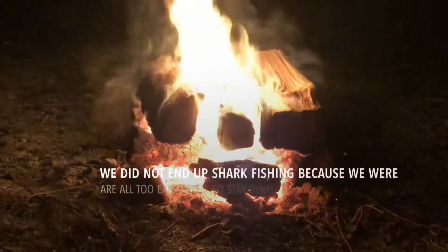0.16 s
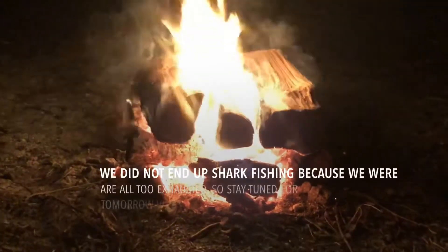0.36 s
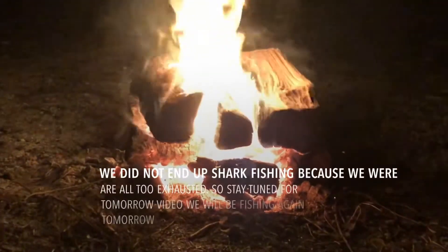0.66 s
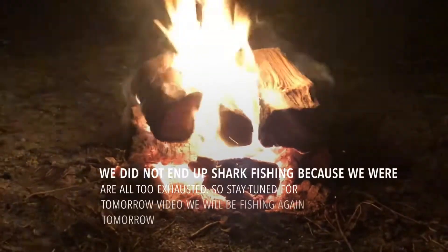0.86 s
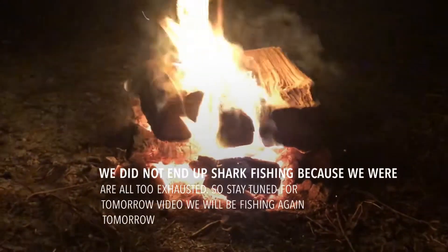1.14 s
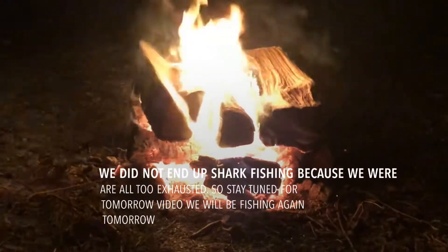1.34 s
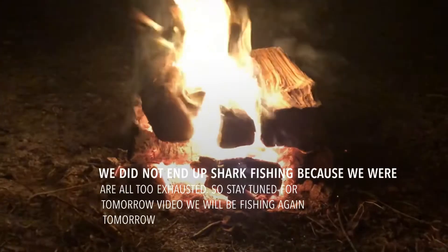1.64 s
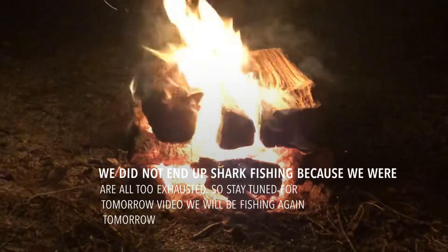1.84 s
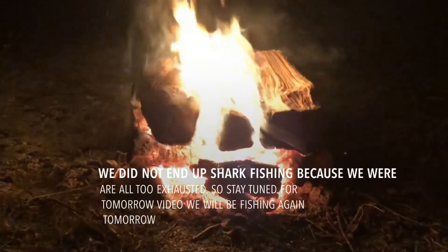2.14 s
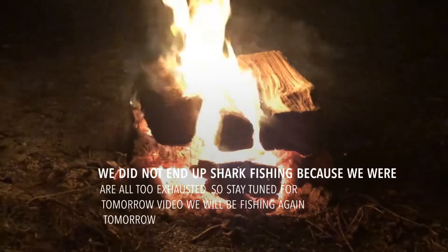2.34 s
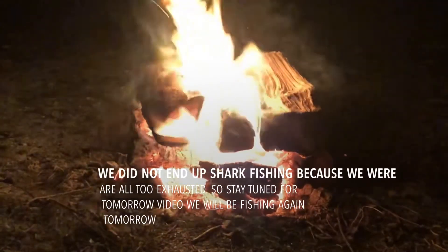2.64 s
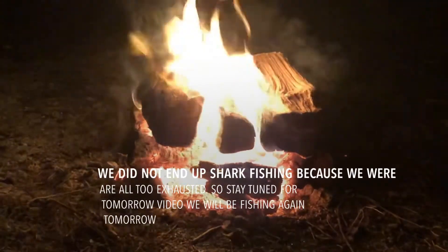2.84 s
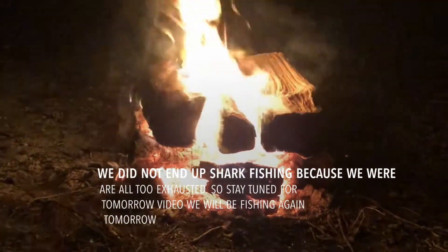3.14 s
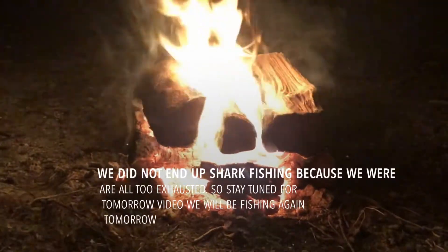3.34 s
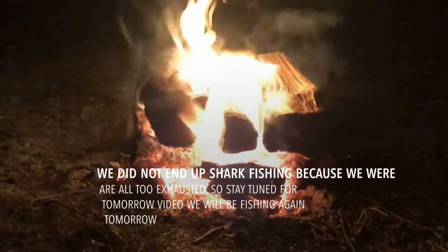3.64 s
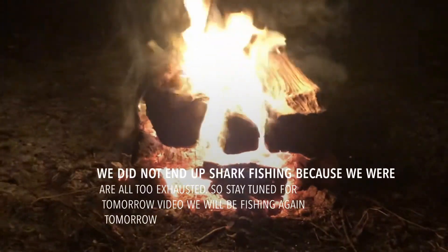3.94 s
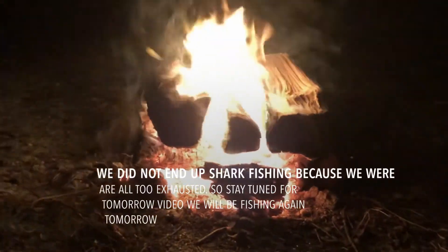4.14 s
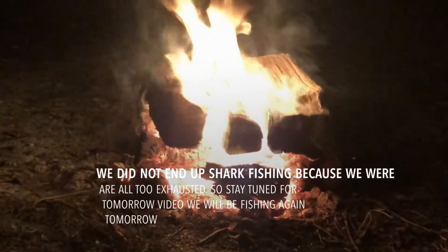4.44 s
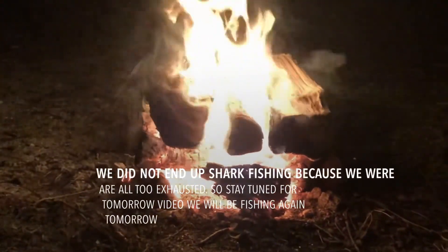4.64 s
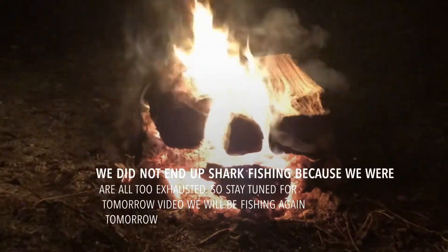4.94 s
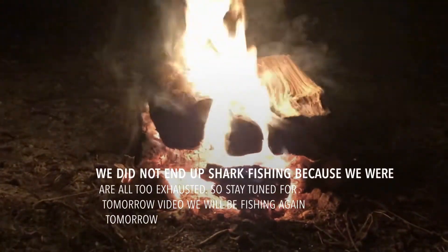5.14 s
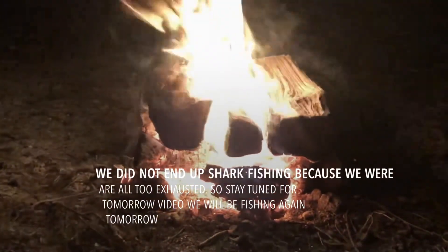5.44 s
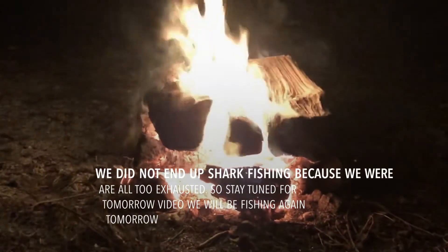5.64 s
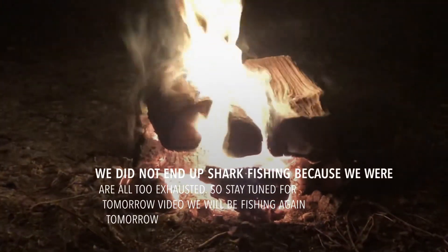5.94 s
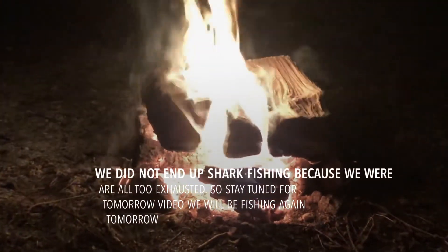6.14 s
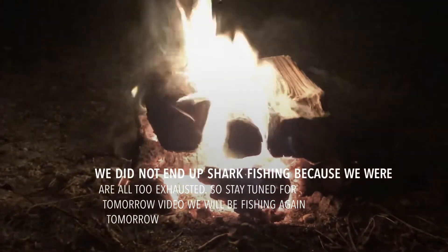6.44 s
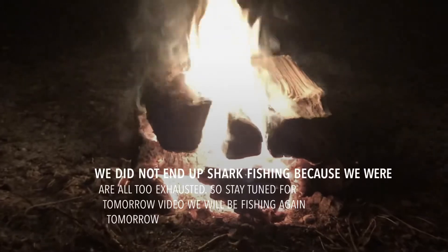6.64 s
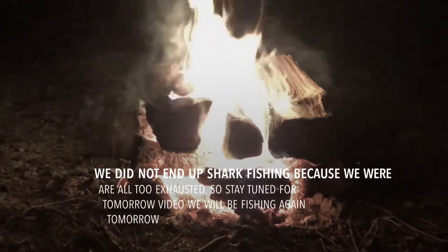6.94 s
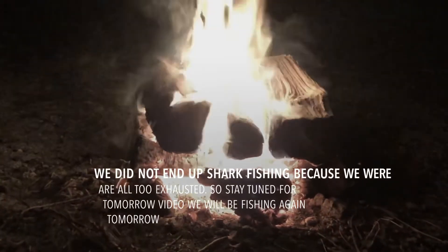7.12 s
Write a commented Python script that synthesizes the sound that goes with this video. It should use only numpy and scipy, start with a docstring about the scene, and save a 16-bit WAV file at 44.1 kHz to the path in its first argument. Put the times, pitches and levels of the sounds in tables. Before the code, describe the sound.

Crickets trill on and off outdoors as burning wood ticks and snaps, with a low flutter of flames and two soft scuffs late on.

```python
"""A campfire at night. From the start, turbulent flames rumble and hiss, the wood ticks, knocks and
pops as its cell walls burst, and a near cricket scrapes its wings in bouts of double pulses over a far
chorus. A lower insect soon joins faintly, and two fainter crickets call between 1.2 and 2.2 s.
At 5.8 s sap sizzles briefly. From 6.3 s something close by scuffs twice by friction, with a soft
swish in between, and the loudest pop comes just before the end."""
import sys
import numpy as np
from scipy import signal
from scipy.fft import rfft, irfft
from scipy.io import wavfile

SR = 44100
rng = np.random.default_rng(int(sys.argv[2]) if len(sys.argv) > 2 else 0)


def wav_out(sig):
    """Save sig, one row per channel (or a flat mono array), as 16-bit PCM at SR to the path in sys.argv[1]."""
    wavfile.write(sys.argv[1], SR, np.round(np.clip(np.atleast_2d(sig).T, -1, 1) * 32767).astype(np.int16))


N = 321043
TIME = np.arange(N) / SR


def pop(ring_hz, ring_db, body_hz, body_db, decay_ms, ring_width_hz=1100, body_width_hz=500):
    """Impulse response: a cell wall bursts and splinters, with a treble ring and a body; unit energy."""
    # spectra of the treble snap and of the woody body: f/Hz, level/dB
    snap_spectrum = [(500, -55), (2800, -25), (4800, -6.5), (8000, -3), (12000, -3), (16000, -5)]
    body_spectrum = [(200, -21), (900, -8), (2500, 8), (5000, 6), (8000, -6), (16000, -35)]
    size = 1024
    hz = abs(np.fft.fftfreq(size, 1 / SR))
    ms = np.arange(size) / SR * 1000
    crack = read(snap_spectrum, hz) * (1 + gain_of(ring_db) / (1 + ((hz - ring_hz) / ring_width_hz) ** 2))
    body = read(body_spectrum, hz) * (1 + gain_of(2) / (1 + ((hz - body_hz) / body_width_hz) ** 2))
    colour = np.hypot(evened(crack), gain_of(body_db + 3) * evened(body))
    ring_down = np.fft.ifft(np.exp(np.conj(signal.hilbert(np.log(colour))))).real  # minimum phase
    splinters = .42 * rng.standard_normal(size) * np.exp(-ms / decay_ms)
    splinters[8] = 1  # the main snap follows the first splinters
    sound = signal.fftconvolve(splinters, ring_down)
    return sound / np.linalg.norm(sound)


def crackle(boost_db=7):
    """Shot noise: many small bursts fall at random among the loud pops, some woody and some thin."""
    # t/s, level before boost/dB, ring f/Hz, ring level/dB, relative body level/dB
    loud_pops = [(.2753, -35, 11900, 10, -25), (.403, -26, 9400, -5, -3), (.446, -24, 9150, 6, -15.5),
                 (.7615, -21.5, 12500, -13, -30), (.8215, -30, 12500, 5, -1),
                 (1.1934, -30.5, 7350, -4, -11), (1.2715, -25, 12400, 18, -16),
                 (1.5344, -33, 11400, 8, -14), (1.5857, -25.5, 10100, 4, -19), (1.6458, -33, 7290, 3, -10),
                 (1.6873, -24, 14800, -6, -32), (1.9693, -35.5, 11500, 0, -8), (2.0268, -32, 14100, 1, -26),
                 (2.0773, -25, 12200, 7, -16), (2.1141, -32.5, 9020, 3, -14),
                 (2.1639, -23.5, 10200, 1, -39), (2.6922, -22, 11900, 4, -22),
                 (3.0734, -34, 13600, -1, -12), (3.4511, -31.5, 12500, -2, -15),
                 (3.7257, -18, 11600, -5, -20), (3.8821, -31.5, 11800, -2, -19), (4.3092, -31, 7320, 3, -6),
                 (4.729, -18.5, 10300, 6, -16), (5.0926, -26.5, 13800, 10, -16),
                 (5.8262, -31, 13400, -4, -13), (6.2261, -20.5, 11350, 27, -25.5),
                 (6.4981, -30.5, 12000, 20, -24), (6.6376, -27, 10700, 3, -25),
                 (7.0104, -27, 13700, 8, -13), (7.018, -27, 9000, -5, -26), (7.177, -24.5, 10500, 3, -18),
                 (7.22, -11, 11500, 10, -17)]
    # small pops and tiny ticks: rate/(1/s), least level before boost/dB, spread/dB, decay t/ms
    small_pops = [(3, -41, 1, 0.54), (80, -55.5, 3, .8)]
    pop_body_hz = 5200  # the mid-treble peak colouring the loud pops
    out = np.zeros(N)
    for start, db, ring_hz, ring_db, body_db in loud_pops:
        sound = pop(ring_hz, ring_db, pop_body_hz, body_db, decay_ms=.54)
        add(out, start + .001, gain_of(db + boost_db) * sound)
    for rate, least_db, spread_db, decay_ms in small_pops:
        draws = rng.random((2048, 5))[:round(rate * N / SR)]
        for when, size, ring_pitch, body_pitch, thinness in draws:
            db = least_db + spread_db * min(-np.log(size), 3.5)
            sound = pop(ring_hz=np.interp(ring_pitch, (0, 1), (8400, 14900)), ring_db=10,
                        body_hz=np.interp(body_pitch, (0, 1), (1500, 5640)), body_db=-1 - 20 * thinness,
                        decay_ms=decay_ms)
            add(out, when * N / SR, gain_of(db + boost_db) * sound)
    return outdoors(out, wet_db=-11, t60=.04)


def flames():
    """Turbulent combustion: burning gas flutters low and flaps in short puffs, under an even hiss."""
    # rumble, hiss of flames and night air, and puffs: f/Hz, relative spectral level/dB
    rumble_spectrum = [(20, -45), (30, -33), (42, -11), (60, 1), (85, -0.5), (140, -2), (200, -7.5),
                       (340, -13), (500, -19.5), (800, -28), (1300, -48), (2200, -80)]
    hiss_spectrum = [(300, 0.5), (700, -1), (1000, 2.5), (1600, -1.5), (2200, -4), (4000, -6), (5500, -6),
                     (7200, -9), (9500, -11.5), (11000, -11), (13500, -7.5), (15800, -14.5)]
    puff_spectrum = [(70, -25), (160, 0), (330, -2), (500, -12), (900, -31), (2000, -70)]
    rumble = fluttering_noise(rumble_spectrum, depth_db=1, rate_hz=9)
    hiss = fluttering_noise(hiss_spectrum, depth_db=1.22, rate_hz=25)
    puffs = fluttering_noise(puff_spectrum, depth_db=4.5, rate_hz=12)
    return gain_of(-50) * evened(rumble) + gain_of(-60) * evened(puffs) + gain_of(-62) * hiss


def knocks():
    """Damped oscillation: each knock rings one or two short tones."""
    # t/s, level/dB, f/Hz, 60 dB decay t/s
    modes = [(.4042, -44.5, 1110, 0.0093), (0.7632, -37.5, 4770, 0.008), (4.251, -45, 3500, .013),
             (4.655, -45.5, 1700, .02), (4.656, -47.5, 2940, .01), (4.7303, -39, 5400, 0.014),
             (7.012, -40.5, 4300, .008), (7.133, -25.5, 1380, 0.0068), (7.133, -40, 950, .012)]
    out, t = np.zeros(N), np.arange(SR // 20) / SR
    for start, db, hz, t60 in modes:
        add(out, start, gain_of(db - 60 * t / t60) * np.sin(2 * np.pi * hz * t))
    return outdoors(out, wet_db=-8, t60=.04)


def sap_sizzle():
    """Modulated noise: sap sizzles in one short, grainy burst of treble."""
    # start t/s, attack t/s, hold t/s, release t/s, level/dB
    burst = (5.843, .01, .075, .07, -61.5)
    # f/Hz, relative spectral level/dB
    spectrum = [(6000, -25), (9000, -2), (10500, 2), (13500, -1), (16000, -10)]
    return grainy_noise(burst, spectrum, grain_db=6)


def cricket(bouts, hz, db, wet_db, waver_hz, roughness):
    """Stridulation: two wing strokes make a chirp; the note sags as the scraper slows to end each."""
    attack, hold, release = .004, .0072, .011  # of one stroke, t/s
    chirp_period_s, stroke_spacing_s, sag_hz_per_s = .063, .0217, 25000
    t = np.arange(0, attack + hold + release, 1 / SR)
    shape = envelope(t, attack, hold, release)
    pitch = hz - sag_hz_per_s * np.maximum(t - attack - hold, 0)
    out = np.zeros(N)
    for first, last in bouts:
        for chirp in paced(first, last, chirp_period_s):
            for middle in (chirp, chirp + stroke_spacing_s):
                detune, size = rng.standard_normal(2)
                stroke = shape * np.sin(phase_of(pitch + 6 * detune))
                if middle > 0:
                    add(out, middle - attack - hold / 2, gain_of(db + .5 * size) * stroke)
    # uneven teeth on the file shake pitch and level
    shake = np.exp(1j * phase_of(waver_hz * drift(250))) * (1 + roughness * drift(300))
    return outdoors((signal.hilbert(out) * shake).real, wet_db, t60=.055)


def crickets():
    """Superposition: one near cricket and two fainter ones call, each at its own pitch."""
    # f/Hz, level/dB, relative echo level/dB, waver f/Hz, roughness (0-1)
    voices = [(6005, -42.3, -16, 14, .13), (5740, -56, -3, 40, .25), (5570, -61, -4, 25, .15)]
    # index of the cricket, first chirp t/s, last chirp t/s
    bouts = [(0, -.024, .164), (0, .477, .477), (0, .867, 1.179), (2, 1.265, 1.33), (1, 1.39, 2.17),
             (0, 1.481, 2.048), (0, 2.435, 3.129), (0, 3.611, 3.987), (0, 4.928, 5.684), (0, 6.125, 6.754),
             (0, 7.078, 7.267)]
    out = np.zeros(N)
    for index, voice in enumerate(voices):
        own_bouts = [(first, last) for caller, first, last in bouts if caller == index]
        out += cricket(own_bouts, *voice)
    return out


def scuffs_and_swish():
    """Friction: streams of tiny, uneven slips make two gritty scuffs and a smoother swish."""
    # start t/s, attack t/s, hold t/s, release t/s, level/dB
    scuff_strokes = [(6.304, .011, .056, .035, -46.2), (7.033, .06, .095, .3, -46.6)]
    swish_stroke = (6.425, .225, .135, .14, -51)
    # one spectrum for each stroke: f/Hz, relative spectral level/dB
    scuff_spectra = [
        [(250, -12), (470, 3.5), (680, -10), (920, -3), (1100, -12), (1290, -6), (1500, -13), (1800, -7),
         (2300, -16), (4400, -14.5), (8000, -19.5), (16000, -26)],
        [(300, -2), (580, -7), (850, 0), (1100, -5.5), (1400, -2.5), (1850, -4), (2300, -9), (4000, -12),
         (7000, -17), (11000, -26), (16000, -30)],
    ]
    swish_spectrum = [(500, 3.5), (2500, -7), (4500, 1), (7000, 3), (9000, -3), (11000, 0.5), (14000, -3),
                      (16000, -15)]
    scuffs = sum(grainy_noise(stroke, spectrum, grain_db=2)
                 for stroke, spectrum in zip(scuff_strokes, scuff_spectra))
    return scuffs + grainy_noise(swish_stroke, swish_spectrum, grain_db=1)


def far_chorus(blur_hz=42, stroke_hz=46):
    """Scattering smears the strokes of far crickets, each chirping at its own rate, into a shimmer."""
    # f/Hz, level/dB, chirp rate f/Hz, bout rate f/Hz
    voices = [(5790, -69.5, 15.4, 0.777), (5990, -64.5, 21, 1.1), (6140, -66.5, 14, 0.68),
              (6160, -63.5, 14, 1.19), (6240, -65.5, 17.3, 0.866), (6420, -71.5, 17, 1.6)]
    out = np.zeros(N)
    for hz, db, chirp_hz, bout_hz in voices:
        strokes = np.maximum(np.sin(phase_of(stroke_hz * (1 + .2 * drift(10)))) + .6, 0)
        chirps = 1 + .5 * np.sin(phase_of(chirp_hz * (1 + .1 * drift(4))))
        bouts = 1 + .5 * np.tanh(2 * drift(bout_hz * 2))
        note = np.sin(phase_of(hz + blur_hz * drift(130)))
        out += gain_of(db) * evened(outdoors(strokes * chirps * bouts * note, wet_db=4, t60=.09))
    return out


def low_insect(hz=4080, db=-72, chirp_s=.275, period_s=.42, stroke_hz=42, pulse_hz=15):
    """Amplitude modulation shapes a faint note, blurred by distance, into chirps of a few pulses."""
    # first chirp t/s, last chirp t/s, relative level/dB
    runs = [(.39, 2.06, -1), (2.47, 3.28, 1.5), (3.72, 4.2, -1.5), (4.92, 5.77, 0)]
    t = np.arange(0, chirp_s, 1 / SR)
    pulses = 1 + .32 * np.cos(2 * np.pi * pulse_hz * (t - chirp_s / 2))
    chirp = signal.windows.tukey(len(t), .5) * pulses
    level = np.zeros(N)
    for first, last, run_db in runs:
        for middle in paced(first, last, period_s):
            add(level, middle - chirp_s / 2, gain_of(run_db) * chirp)
    note = np.sin(phase_of(hz + 50 * drift(150)))
    strokes = 1 + np.sin(phase_of(stroke_hz * (1 + .25 * drift(15))))
    return gain_of(db + drift(5)) * level * evened(outdoors(note * strokes, wet_db=0, t60=.08))


def outdoors(x, wet_db, t60):
    """Scattering from ground and plants adds a thin, short tail."""
    t = np.arange(SR // 3) / SR
    tail = rng.standard_normal(len(t)) * gain_of(-60 * t / t60) * (t > .001)
    return x + gain_of(wet_db) * signal.fftconvolve(x, tail / np.linalg.norm(tail))[:N]


def fluttering_noise(spectrum, depth_db, rate_hz):
    """Slow random modulation makes the level of coloured noise flutter."""
    return coloured(rng.standard_normal(N), spectrum) * gain_of(depth_db * drift(rate_hz))


def grainy_noise(stroke, spectrum, grain_db):
    """Fast random modulation breaks noise into grains, filtered and set under one envelope."""
    start, attack, hold, release, db = stroke
    grains = rng.standard_normal(N) * gain_of(grain_db * drift(400))
    return gain_of(db) * envelope(TIME - start, attack, hold, release) * coloured(grains, spectrum)


def coloured(x, spectrum):
    """Filtering: multiplies the spectrum of x by the given one; rms 1."""
    hz = np.fft.rfftfreq(len(x), 1 / SR)
    return evened(irfft(rfft(x) * read(spectrum, hz), len(x)))


def read(spectrum, hz):
    """Interpolation on a log-frequency axis gives a spectrum's gain at hz."""
    f, db = np.transpose(spectrum)
    return gain_of(np.interp(np.log(hz + 1), np.log(f + 1), db))


def drift(hz):
    """Random fluctuation of rms 1, mostly below the given rate."""
    knots = rng.standard_normal(int(N / SR * hz * 2) + 3)
    return evened(np.interp(TIME * hz * 2, np.arange(len(knots)), knots))


def envelope(t, attack, hold, release):
    """Amplitude envelope: a linear rise, a hold and a quadratic fall."""
    return np.clip(t / attack, 0, 1) * np.clip(1 - (t - attack - hold) / release, 0, 1) ** 2


def paced(first, last, period):
    """Periodic repetition: even times from first to last, about one period apart."""
    return np.linspace(first, last, round((last - first) / period) + 1)


def phase_of(hz):
    """Phase is the time integral of angular frequency."""
    return 2 * np.pi * np.cumsum(hz) / SR


def gain_of(db):
    """Amplitude ratio of a level in decibels."""
    return 10 ** (np.asarray(db) / 20)


def evened(x):
    """Normalisation to rms 1."""
    return x / np.sqrt(np.mean(x ** 2) + 1e-20)


def add(mix, start, sound):
    """Superposes a sound on the mix from a start time in seconds."""
    part = mix[max(round(start * SR), 0):][:len(sound)]
    part += sound[:len(part)]


def scene():
    """Superposition: fire, insects and scuffs sum at one listening point."""
    calls = crickets()
    fire = flames() + crackle() + sap_sizzle()
    return (calls + far_chorus() + low_insect() + fire + knocks() + scuffs_and_swish())[None]


def record(dry, cutoff_hz=16000):
    """Band limiting: a linear-phase low-pass removes the highest treble."""
    low_pass = signal.firwin(301, cutoff_hz, window=("kaiser", 8), fs=SR)
    return signal.oaconvolve(dry, low_pass[None], "same")


dry = scene()
out = record(dry)
wav_out(out)
```